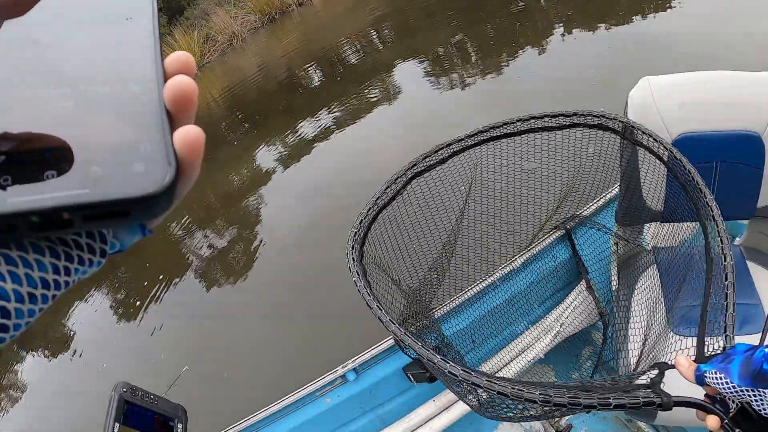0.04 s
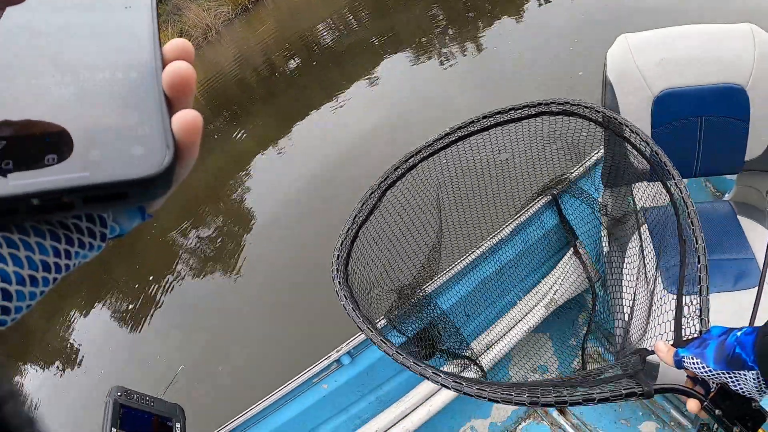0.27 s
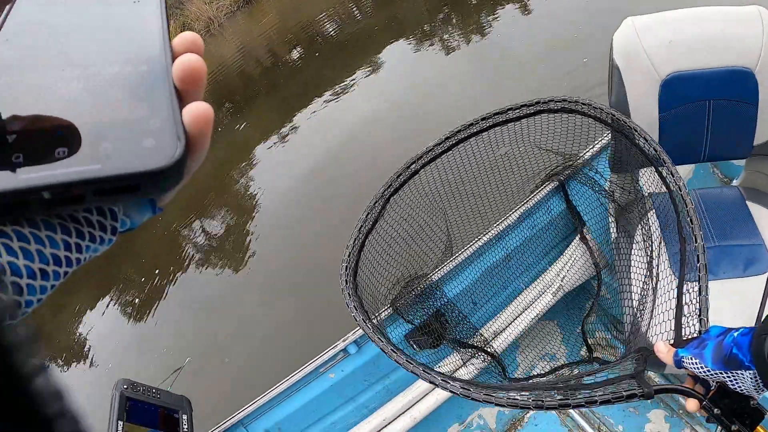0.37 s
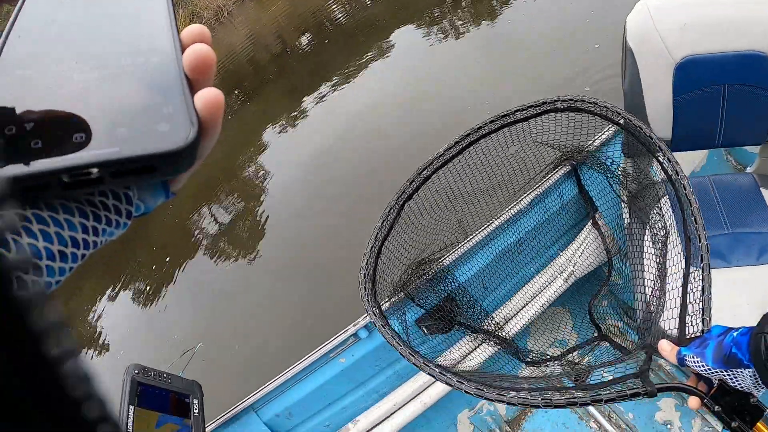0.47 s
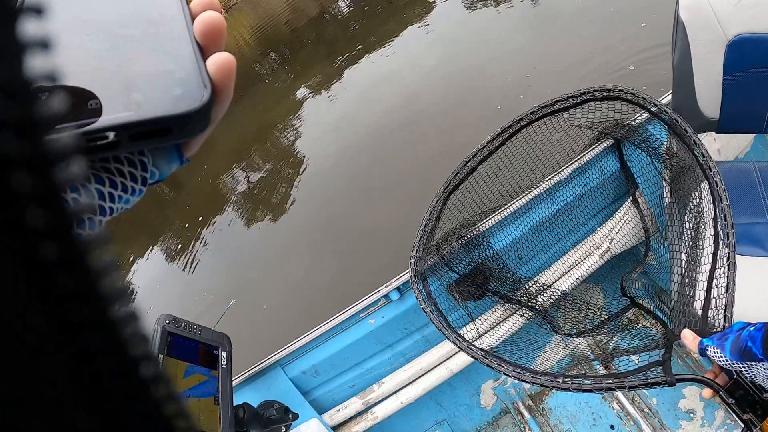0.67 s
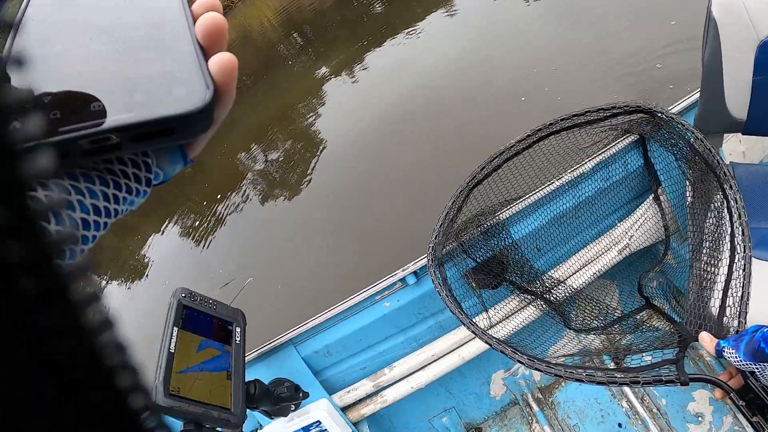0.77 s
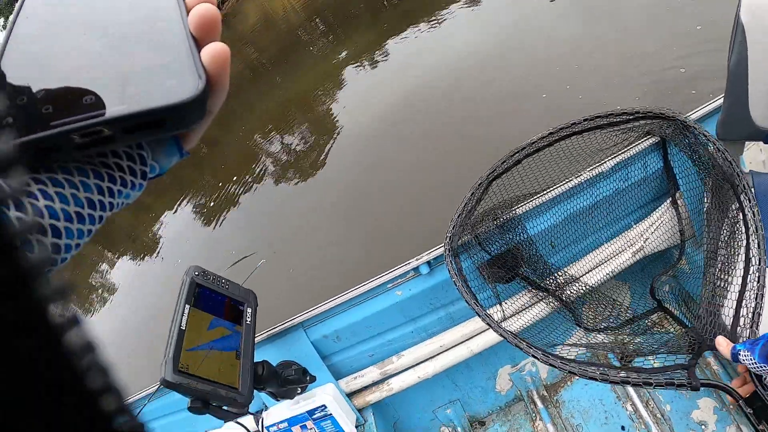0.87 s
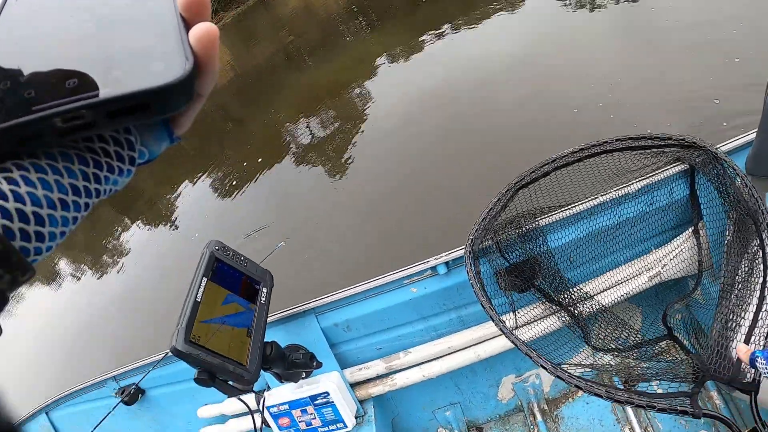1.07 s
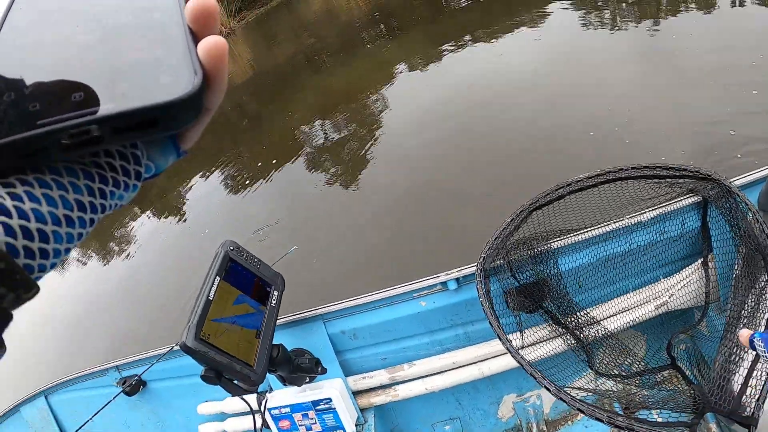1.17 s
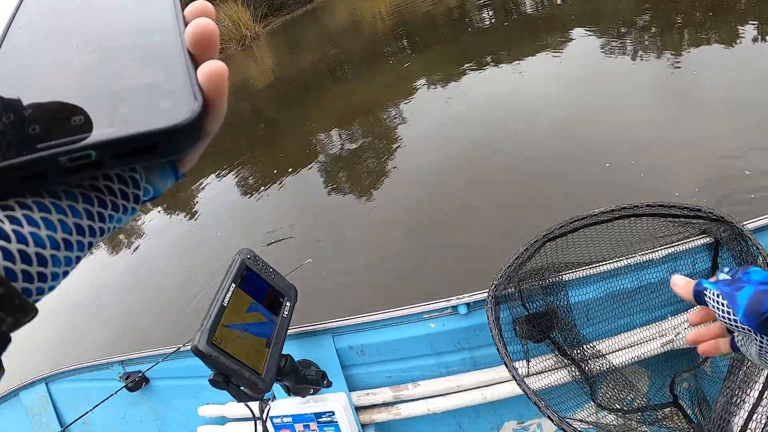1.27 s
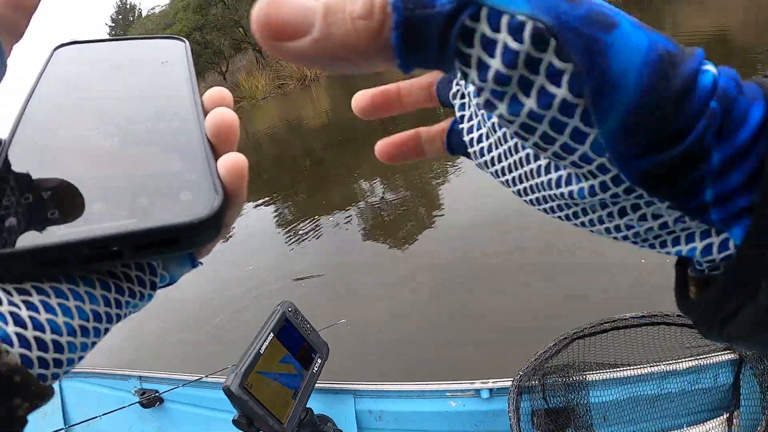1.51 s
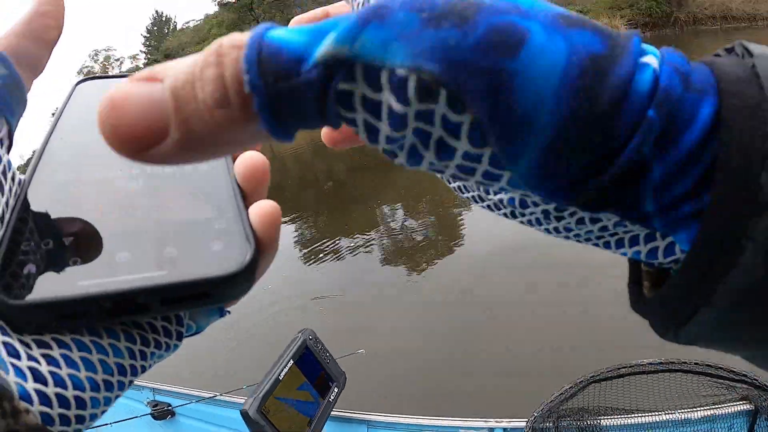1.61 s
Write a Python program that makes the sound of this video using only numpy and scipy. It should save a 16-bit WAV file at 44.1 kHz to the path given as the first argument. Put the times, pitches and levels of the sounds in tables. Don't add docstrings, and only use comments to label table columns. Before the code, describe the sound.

Hollow metallic thumps as a net is set down against a thin metal boat hull, then light taps

```python
import sys
import numpy as np
from scipy import signal
from scipy.io import wavfile

SR = 44100
rng = np.random.default_rng(int(sys.argv[2]) if len(sys.argv) > 2 else 0)


def field_ratio(decibels):
    return 10 ** (np.asarray(decibels, dtype=float) / 20)


def persist_wave(psi):
    counts = np.round(np.clip(psi, -1, 1) * 32767).astype(np.int16)
    wavfile.write(sys.argv[1], SR, np.atleast_2d(counts).T)


N = 72765
T = np.arange(N) / SR

# t/s, boom level/dB, crack level/dB, crack tilt/(dB per octave)
SPOT_ONE_CONTACTS = [(0.042, -45.5, -56, 3), (0.2173, -53, -5, 1), (0.2208, -6, -42, -16.5),
                     (0.275, -19, -37, -3), (0.329, -20.5, -47, 7.5), (0.378, -28.5, -52, -12)]
SPOT_TWO_CONTACTS = [(0.4817, -36, -10.5, 0.8), (.486, -4, -26, 2.5), (.496, -21.5, -28, -6),
                     (.543, -20.5, -22.5, -1), (.549, -35, -32, 3), (0.56, -18, -33.5, -7.5),
                     (.595, -21.5, -24, -1.5), (.602, -34, -38, -1), (.609, -24.5, -26.5, 0.5),
                     (.617, -26.5, -32, -2), (0.637, -25.5, -32, 0), (0.706, -34, -34, -5)]
SPOT_THREE_CONTACTS = [(0.7372, -7.5, -22.5, -0.5), (.748, -17, -29.5, 2.4), (0.754, -21.5, -28, 1.5),
                       (0.775, -16, -33.5, 6), (0.83, -20, -42, 1), (0.924, -44, -41, 1),
                       (0.966, -34.5, -41, -2), (1.034, -67, -49, -9), (1.085, -25.5, -42, -4),
                       (1.144, -32, -43.5, -0.5)]
# t/s, level/dB
MUTING = [(.345, -3), (.352, -7.5), (.478, -5), (.483, -7.5), (.662, -2.5), (.668, -5.5), (.731, -4),
          (.736, 0.5), (.808, -0.5), (.815, -5.5), (.865, -6), (.875, -7), (1.0, -5.5)]


def rms_one(x):
    return x / np.sqrt(np.mean(x ** 2) + 1e-20)


def curve(rows, axis=1):
    return np.interp(T, np.array(rows)[:, 0], np.array(rows)[:, axis])


def at_hz(points, hz):
    return np.interp(np.log(hz), np.log(np.array(points)[:, 0]), np.array(points)[:, 1])


def drift(rate_hz):
    r = np.exp(-80 * np.pi * rate_hz / SR)
    white = rng.standard_normal(N // 40 + 2002)
    slow = signal.lfilter([1], [1, -2 * r, r * r], white)[2000:]
    return np.interp(np.arange(N) / 40, np.arange(len(slow)), rms_one(slow))


def decay(t60):
    return field_ratio(-60 / (max(t60, 0.002) * SR))


def ring(force, hz, t60):
    r, w = decay(t60), 2 * np.pi * hz / SR
    return signal.lfilter([0, np.sin(w)], [1, -2 * r * np.cos(w), r * r], force + 1e-18)


def clicks(s, sizes):
    return np.bincount((np.asarray(s) * SR).astype(int), sizes, N)


def fall(force, t60):
    return signal.lfilter([1], [1, -decay(t60)], force + 1e-18)


def soften(x, seconds):
    r = np.exp(-1 / (max(seconds, 1e-5) * SR))
    return signal.lfilter([1 - r], [1, -r], x)


def bands(low_hz):
    edges = low_hz * 2 ** np.arange(0, np.log2(17000 / low_hz), 1 / 3)
    white = rng.standard_normal((2, N))
    out = []
    for k, (low, high) in enumerate(zip(edges, edges[1:])):
        sos = signal.butter(2, [low, high], "band", fs=SR, output="sos")
        out.append((np.sqrt(low * high), signal.sosfilt(sos, white[k % 2])))
    return out


def grains(per_s, spread_db):
    sizes = field_ratio(spread_db * np.minimum(rng.exponential(1, N), 5)) * rng.choice([-1, 1], N)
    return rms_one(sizes * (rng.random(N) < per_s / SR))


def rustle():
    # t/s, level/dB, tilt/(dB per octave)
    movement = [(0, -41, 0), (.1, -43.5, -1), (.21, -43, 0), (.26, -55, -6.5), (.34, -50.5, -1.5),
                (.45, -50, 2), (.6, -47, 1.5), (.76, -52.5, 2.5), (.84, -55, -4), (1.0, -57, -2.5),
                (1.14, -55.5, -2), (1.24, -49, 0.5), (1.37, -47.5, 1), (1.5, -44.5, 1), (1.58, -41, 1.5),
                (1.65, -40, 1.5)]
    # f/Hz, level/(dB per Hz)
    cloth = [(40, -19), (100, -14), (255, -5.5), (670, -9), (1500, -16.5), (3000, -21), (8500, -41.5),
             (14000, -34)]
    # f/Hz, width/Hz, level/dB
    cloth_peaks = [(2800, 650, -14), (3990, 1600, -23.5), (5880, 390, -25.5), (12100, 1500, -34)]
    patchy_db, grain_share = 2.0, 0.4
    together, tilt = drift(21), curve(movement, axis=2)
    body = 0
    for hz, noise in bands(40):
        patches_db = patchy_db * (0.5 * together + drift(7))
        body = body + noise * field_ratio(at_hz(cloth, hz) + tilt * np.log2(hz / 2000) + patches_db)
    feed = grain_share * grains(2000, 3.0) + rng.standard_normal(N)
    peaks = 0
    for hz, width, db in cloth_peaks:
        t60 = np.log(1000) / (np.pi * width)
        peaks = peaks + field_ratio(db) * rms_one(ring(feed, hz, t60))
    return field_ratio(curve(movement) + 6) * (rms_one(body) + peaks)


def hum():
    # t/s, level/dB
    hum_level = [(0, -43), (.03, -43), (.06, -73), (.078, -32.5), (.13, -41.5), (.165, -46), (.19, -45),
                 (.215, -33.5), (.23, -88)]
    level = field_ratio(curve(hum_level) + 2.0 * drift(30))
    pitch_hz = 680 * (1 + 0.006 * drift(20))
    return level * np.sin(2 * np.pi * np.cumsum(pitch_hz) / SR)


def gear():
    # t/s, level/dB, f/Hz, t60/s, rise/s
    taps = [(0.01, -31.5, 291, 0.04, 0.002), (.028, -41, 787, 0.066, 0.0024),
            (0.081, -48, 432, 0.058, .003), (0.096, -42, 460, 0.032, 0.0025),
            (0.096, -32.5, 1050, 0.022, 0.0022), (0.131, -41, 2700, 0.088, 0.0038),
            (0.151, -34.5, 888, 0.047, 0.0036), (1.214, -42, 2985, 0.022, 0.0015),
            (1.255, -48, 3140, 0.025, 0.0017), (1.213, -73, 298, 0.09, 0.0017),
            (1.262, -40.5, 554.8, 0.22, 0.0033), (1.269, -47.5, 820, 0.058, 0.0015),
            (1.495, -42, 850, 0.26, 0.004), (1.4964, -39, 2880, 0.026, 0.00026),
            (1.5043, -34.5, 2700, 0.028, 0.0007), (1.5032, -41, 3150, 0.025, 0.0006),
            (1.509, -42.5, 2967, 0.17, 0.0008), (1.537, -35.5, 520, 0.028, 0.0006),
            (1.5655, -34.5, 2910, 0.028, 0.0007), (1.581, -43, 3030, 0.066, .0008),
            (1.582, -36, 492, 0.018, 0.00066), (1.6245, -36.5, 2800, 0.02, 0.00042),
            (1.638, -42, 2920, .1, .002), (1.623, -40.5, 1195, 0.13, 0.0028)]
    out = 0
    for s, db, hz, t60, rise_s in taps:
        narrow = rms_one(ring(rng.standard_normal(N), hz, 12 / hz))
        tone = np.sin(2 * np.pi * hz * T) + 0.86 * narrow
        out = out + tone * soften(fall(clicks([s], [field_ratio(db)]), t60), rise_s)
    return out


def hull():
    # f/Hz, t60/s, then level/dB when struck at spot one, two, three
    hull_modes = [(101.5, 0.38, -12.5, -16, -40.5), (142.2, 0.91, -21, -33, -29),
                  (208.8, 1, -14.5, -17.5, -18.5), (242.4, 0.26, -10, -8, -19), (267, 0.36, -8, -7, -11),
                  (302, 0.65, -7.5, -29.5, -18.5), (341.7, 0.3, -4, -3, -15.5),
                  (382.3, 0.35, -6, -4.5, -12.5), (430, 0.29, -10, -11, -18),
                  (486, 0.16, -14, -10.5, -18.5), (525.5, 0.31, -8, -8, -20.5),
                  (582.4, 0.14, -13.5, -3.5, -20), (645, 0.12, -22.5, -12.5, -25.5),
                  (846.6, 0.2, -18.5, -14.5, -22.5)]
    # t/s, level/dB
    rocking = [(0, -69), (.2, -81), (.45, -32.5), (.55, -25), (.655, -30), (.675, -26), (.9, -41.5),
               (1.15, -46), (1.65, -57.5)]
    side_split, split_hz, side_db = 0.0206, 5.8, -3
    spread_s = 0.00265
    scatter_db = 1.5
    drag = field_ratio(curve(rocking)) * grains(400, 3.55)
    spots = [np.array(rows) for rows in (SPOT_ONE_CONTACTS, SPOT_TWO_CONTACTS, SPOT_THREE_CONTACTS)]
    chance = [rng.standard_normal((len(spot), len(hull_modes), 3)) for spot in spots]
    out = 0
    for k, (hz, t60, *spot_db) in enumerate(hull_modes):
        for j, side in enumerate((0, -1, 1)):
            late_s = abs(side) * spread_s * rng.uniform(0.2, 1)
            force = drag * field_ratio(np.mean(spot_db) - 24.5)
            for spot, mode_db, c in zip(spots, spot_db, chance):
                blow_db = spot[:, 1] + mode_db + scatter_db * c[:, k, j]
                force = force + clicks(spot[:, 0] + late_s, field_ratio(blow_db))
            pitch_hz = hz + side * (hz * side_split + split_hz) * rng.uniform(0.35, 1.5)
            level = (-1) ** (k + side) * field_ratio(side_db * abs(side) - 2.5)
            out = out + level * ring(force, pitch_hz, t60)
    sos = signal.butter(2, [70, 920], "band", fs=SR, output="sos")
    return field_ratio(curve(MUTING)) * signal.sosfilt(sos, out)


def cracks():
    # f/Hz, level/dB, t60/s
    plate_modes = [(1103, -29.5, 0.14), (1179, -24, 0.085), (1550, -22.5, 0.048), (1824, -19, 0.029),
                   (2053, -26, 0.08), (2420, -24.5, 0.026), (3710, -32.5, 0.053), (4460, -31, 0.027)]
    # f/Hz, level/(dB per Hz)
    crack_spectrum = [(500, -4), (1000, -12), (1800, -17.5), (3000, -21), (5600, -20.5), (8000, -45),
                      (10500, -28), (14500, -59.5)]
    # f/Hz, t60/s
    crack_decay = [(500, 0.16), (2000, 0.062), (6000, 0.022), (14000, 0.036)]
    plate_lag_s = 0.0003
    tail_db, tail_t60_s = -39.5, 0.35
    first_rise_s, bounce_rise_s = 0.002, 0.0025
    s, _, db, tilt = np.transpose(SPOT_ONE_CONTACTS + SPOT_TWO_CONTACTS + SPOT_THREE_CONTACTS)
    first = np.isin(s, [SPOT_ONE_CONTACTS[1][0], SPOT_TWO_CONTACTS[0][0], SPOT_THREE_CONTACTS[0][0]])
    out = 0
    for k, (hz, mode_db, t60) in enumerate(plate_modes[::-1]):
        blows = clicks(s + k * plate_lag_s, field_ratio(db + 8.5 + mode_db))
        out = out + (-1) ** k * ring(blows, hz, t60)
    for hz, noise in bands(640):
        sizes = field_ratio(db + 13.5 + tilt * np.log2(hz / 2000) + at_hz(crack_spectrum, hz))
        force = soften(clicks(s, sizes * first), first_rise_s)
        force = force + soften(clicks(s, sizes * ~first), bounce_rise_s)
        burst = fall(force, at_hz(crack_decay, hz))
        out = out + noise * (burst + field_ratio(tail_db) * fall(force, tail_t60_s))
    return out


def panels():
    # t/s, level/dB, f/Hz, t60/s
    panel_rings = [(.2226, -11, 577, 0.052), (.2226, -6, 266, 0.35), (0.2224, -6.5, 349, 0.17),
                   (.276, -13.5, 216.5, 0.2), (0.4864, -9, 270.9, 0.34), (0.486, -3, 375.7, 0.22),
                   (.6, -26, 384, 0.24), (.705, -27.5, 390, 0.14), (.738, -8.5, 262, 0.078),
                   (.738, -14, 377, 0.081), (0.7557, -6, 340.7, 0.26), (.792, -20.5, 350, 0.064),
                   (0.829, -15, 238, 0.12), (0.83, -24, 346.3, 0.17), (0.931, -30, 263, 0.48),
                   (0.954, -34.5, 276.6, 0.34), (1.045, -38, 488, 0.44)]
    rings = 0
    for s, db, hz, t60 in panel_rings:
        rings = rings + soften(ring(clicks([s], [field_ratio(db)]), hz, t60), 0.00012)
    sos = signal.butter(2, 170, "high", fs=SR, output="sos")
    return field_ratio(curve(MUTING)) * signal.sosfilt(sos, rings)


def buzz():
    # t/s, level/dB
    buzz_level = [(.48, -77), (.5, -69), (.58, -59.5), (.64, -56), (.71, -61.5), (.735, -63), (.76, -56),
                  (.79, -54), (.82, -63.5), (.84, -86)]
    # f/Hz, level/dB, t60/s, level change/(dB per s)
    buzz_modes = [(3940, 0, 0.05, 70), (4260, -3, 0.022, -35), (4060, -5, .025, -15), (3780, -10, .02, -10)]
    chatter = grains(1200, 2.0)
    age_s = np.minimum(T, buzz_level[-1][0]) - 0.7245
    out = 0
    for hz, db, t60, slope_db in buzz_modes:
        out = out + field_ratio(db + slope_db * age_s) * rms_one(ring(chatter, hz, t60))
    return field_ratio(curve(buzz_level)) * out


def drip():
    start_s, level_db, hz, rise_per_s = 1.556, -33, 430, 150
    t60_s, lasts_s = 0.1, 0.014
    age_s = np.clip(T - start_s, 0, 0.03)
    chirp = np.sin(2 * np.pi * np.cumsum(hz * (1 + rise_per_s * age_s)) / SR)
    envelope = fall(clicks([start_s], [field_ratio(level_db)]), t60_s) * (age_s < lasts_s)
    return chirp * soften(envelope, 0.0015)


def scene():
    handling = rustle() + hum() + gear()
    boat = hull() + cracks() + panels() + buzz()
    return (handling + boat + drip())[None]


def band_limit(x):
    return signal.sosfilt(signal.butter(12, 14760, fs=SR, output="sos"), x)


def record(dry):
    x = signal.sosfilt(signal.butter(2, 45, "high", fs=SR, output="sos"), dry)
    x = 1.3 * np.tanh(x / 1.3)
    x = signal.sosfilt(signal.cheby2(8, 50, 15000, fs=SR, output="sos"), x)
    x = signal.sosfilt(signal.butter(4, 10860, fs=SR, output="sos"), x)
    return band_limit(x)


dry = scene()
out = record(dry)
persist_wave(out)
```